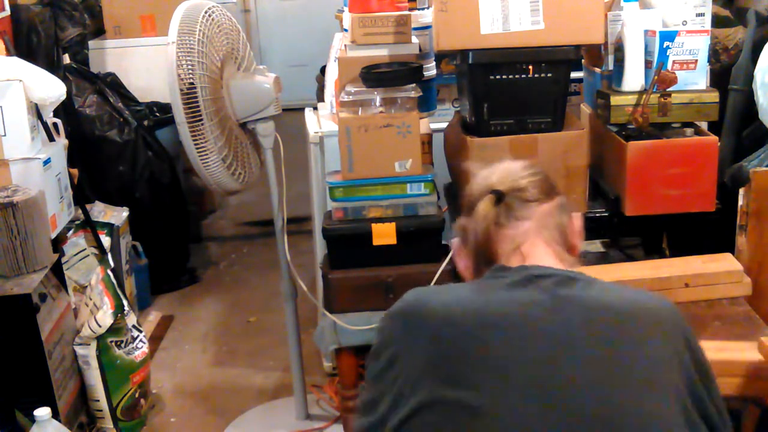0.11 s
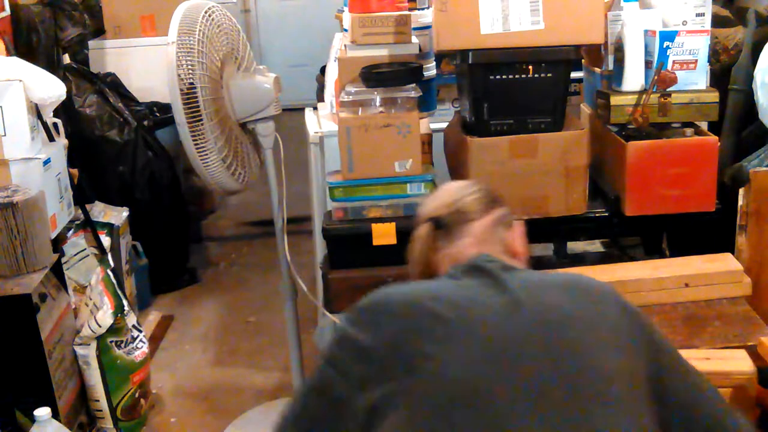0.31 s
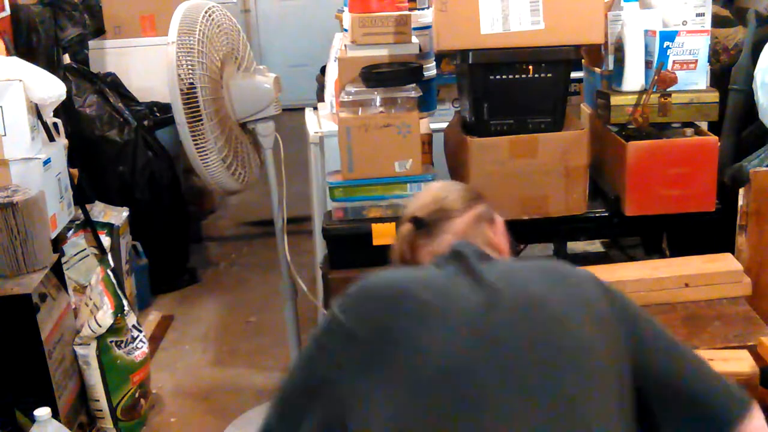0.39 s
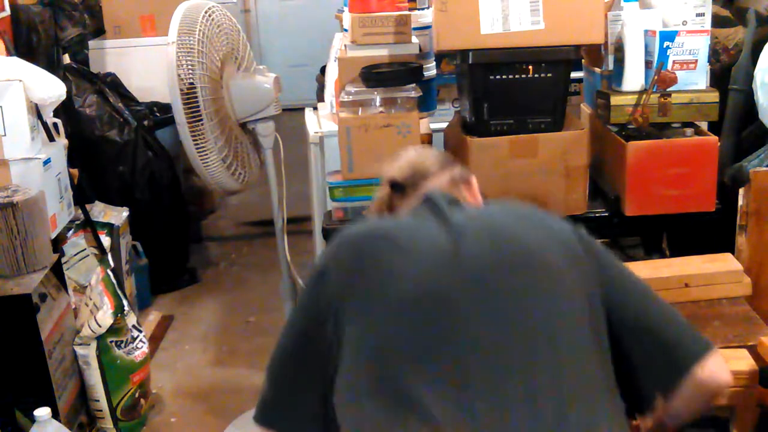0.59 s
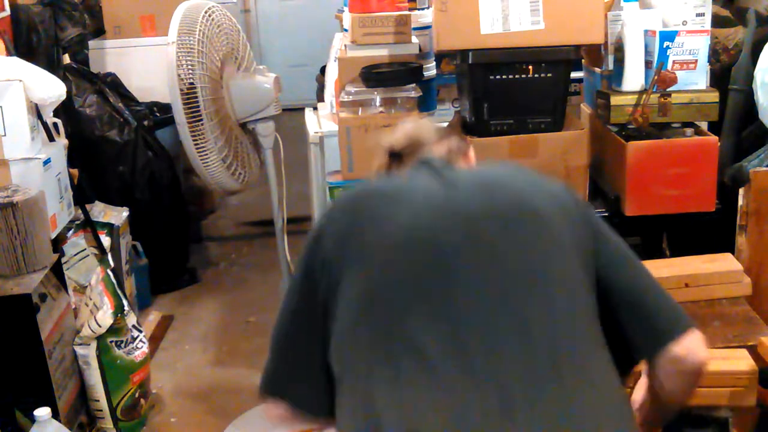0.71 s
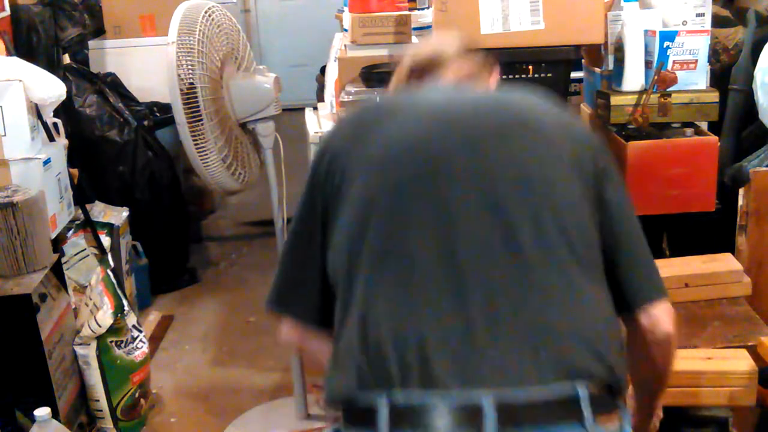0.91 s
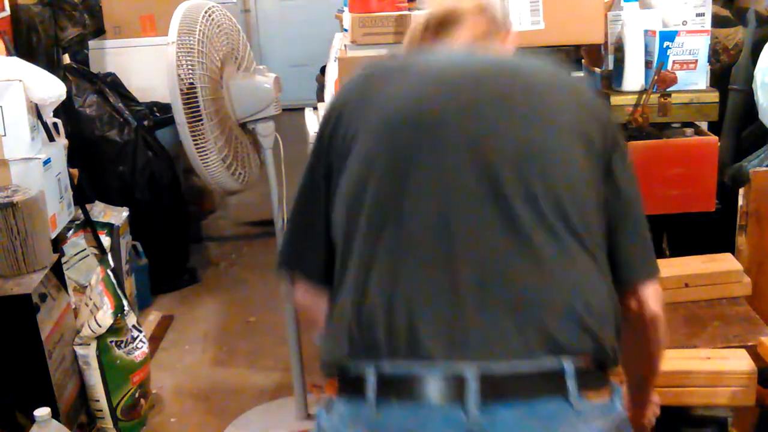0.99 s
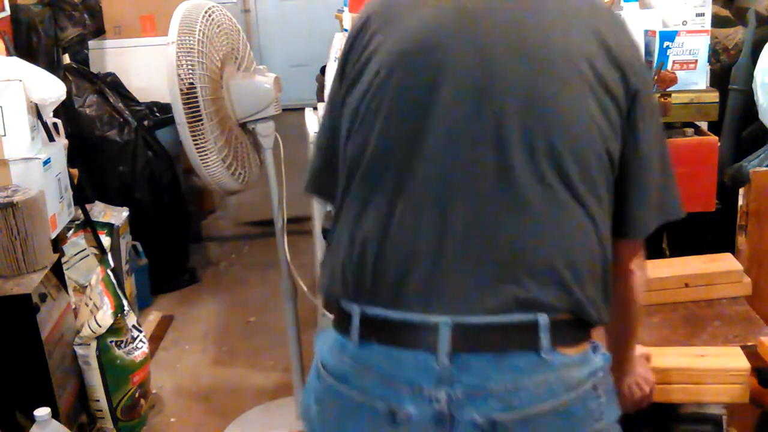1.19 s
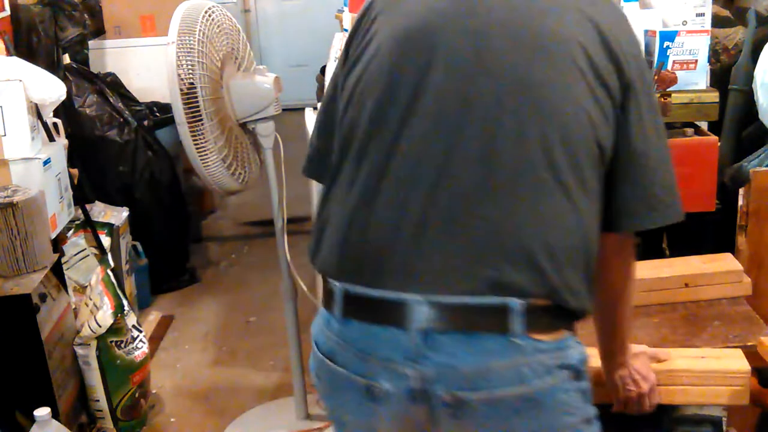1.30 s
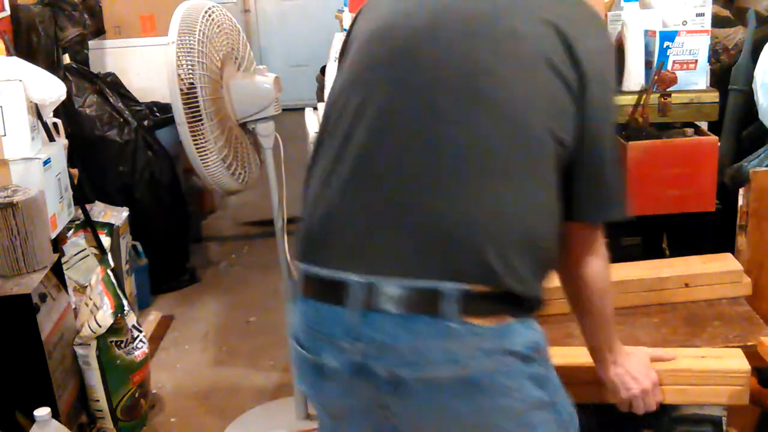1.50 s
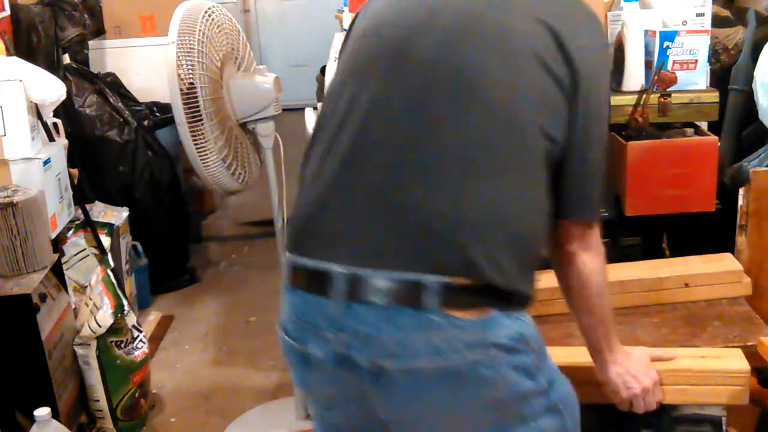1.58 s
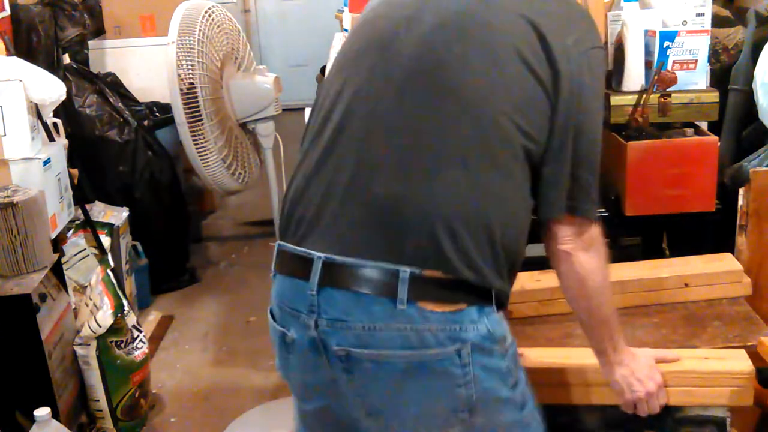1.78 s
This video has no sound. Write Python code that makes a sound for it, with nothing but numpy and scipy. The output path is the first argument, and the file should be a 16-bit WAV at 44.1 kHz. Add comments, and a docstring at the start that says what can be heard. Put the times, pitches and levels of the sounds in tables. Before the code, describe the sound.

Short wooden boards are stacked close by in a small, dry garage workroom. Faint scuffing and taps lead to a full, low clunk at 0.25 seconds, with small knocks after it. A bright clack at 0.7 starts a hollow, raspy slide along the pile until about 1.15, ending in a soft bump. Light bumps follow near 1.45 and 1.8, over faint hiss and low rumble.

```python
"""Short wooden boards are stacked in a small, dry garage workroom, over faint hiss and a low rumble.
After a scuff and small taps, one board clunks down and a second clacks against it: shaped noise and
ringing tones make the knocks, and swinging low tones make the pile's thumps. The board then slides
along the pile until it stops: random little slips drive its resonances and a dry rasp. Light scuffs,
made of thousands of tiny catches a second, and soft bumps go on to the end. Short echoes add the room."""
import sys
import numpy as np
from scipy import signal
from scipy.fft import rfft, irfft, next_fast_len
from scipy.io import wavfile

SR = 44100
rng = np.random.default_rng(int(sys.argv[2]) if len(sys.argv) > 2 else 0)


def wav_record(signal):
    """Record a signal, one row per channel, as 16-bit PCM in the file named by sys.argv[1]."""
    frames = np.transpose(np.atleast_2d(signal))
    bounded = np.clip(frames, -1, 1)
    # unit amplitude maps onto the largest positive 16-bit level
    quanta = np.round(bounded * 32767).astype(np.int16)
    wavfile.write(sys.argv[1], SR, quanta)


N = 79380
T = np.arange(N) / SR  # time in the scene [s]
RING_T = np.arange(int(.35 * SR)) / SR  # time since one contact [s]

# centres of the bass, body, crack and top registers: (frequency [Hz])
REGISTERS = (250, 1000, 4500, 10000)
# the longer rings of a board: (frequency [Hz], energy [dB], time to fall by 60 dB [s])
BOARD_RINGS = [(223, -20, 0.068), (326.2, -22, 0.16), (411.9, -19.5, 0.27), (499, -20, 0.06),
               (774, -24, 0.16), (828, -26.5, 0.11), (1110, -19, 0.053), (1278, -21, 0.043),
               (1618, -19.5, .09), (2113, -25, 0.054), (3030, -19, .16), (4330, -32, 0.1), (5500, -16, .17),
               (6305, -15, 0.057), (6090, -19, 0.077), (6650, -15.5, 0.069), (7230, -17.5, 0.15)]


def from_db(db):
    """Turn decibels into a gain."""
    return 10 ** (np.asarray(db) / 20)


def unit(x):
    """Scale a sound to a total energy of 1."""
    return x / np.sqrt(np.sum(x ** 2) + 1e-20)


def dying(t60):
    """Fade exponentially, falling by 60 dB in t60 seconds."""
    return np.exp(-np.log(1000) * RING_T / t60)


def shaped(x, points):
    """Colour a sound along (Hz, dB) points with a filter that never answers ahead of its input."""
    size = 2 * next_fast_len(len(x))
    hz, db = np.transpose(points)
    bins_hz = np.arange(size // 2 + 1) * SR / size
    curve_db = np.interp(np.log(bins_hz + 1), np.log(hz), db)
    # folding the cepstrum onto positive times gives the minimum-phase filter
    cepstrum = irfft(np.log(from_db(curve_db)))
    cepstrum[1:size // 2] *= 2
    cepstrum[size // 2 + 1:] = 0
    response = np.exp(rfft(cepstrum))
    return irfft(rfft(x, size) * response)[:len(x)]


def through(x, response):
    """Let every sample of x set off a copy of the response."""
    return signal.fftconvolve(x, response)[:len(x)]


def add(out, s, x):
    """Mix x in at time s [s], dropping what lies outside the scene."""
    start = int(s * SR)
    x, start = x[max(-start, 0):], max(start, 0)
    out[start:start + len(x)] += x[:max(N - start, 0)]


def ringing(modes):
    """Sum dying sine tones, each starting at a random point of its cycle."""
    total = np.zeros(len(RING_T))
    for hz, db, t60 in modes:
        tone = np.sin(2 * np.pi * (hz * RING_T + rng.random()))
        total += from_db(db) * unit(tone * dying(t60))
    return total


def friction(size, rate, spread_db):
    """Stick and slip: random clicks of uneven strength, scaled to an rms of 1."""
    strengths = from_db(spread_db * np.minimum(rng.exponential(1, size), 4))
    clicks = strengths * rng.choice([-1, 1], size)
    slips = rng.random(size) < rate / SR
    return unit(clicks * slips) * np.sqrt(size)


def background():
    """Filtered noise gives faint hiss, and a rumble that rises while the boards are moved."""
    # colour of the still room's hiss: (frequency [Hz], gain [dB])
    hiss_colour = [(60, -55), (140, -52), (300, -56.5), (1000, -62), (3000, -67), (6000, -67), (9000, -77),
                   (14000, -81)]
    # colour of the rumble: (frequency [Hz], gain [dB])
    rumble_colour = [(20, -36.5), (45, -40.5), (85, -40), (125, -60.5), (300, -82.5)]
    # rise and fall added to the rumble: (time [s], level [dB])
    rumble_level = [(0, 2), (.25, 0.5), (.32, 9), (.55, 3.5), (1.0, 1.5), (1.3, 0.5), (1.8, -2.5)]
    s, db = np.transpose(rumble_level)
    hiss, rumble = rng.standard_normal((2, N))
    return shaped(hiss, hiss_colour) + from_db(np.interp(T, s, db)) * shaped(rumble, rumble_colour)


def workroom(x):
    """Dense, quickly dying reflections from boxes and shelves, made from fading noise."""
    # colour of the reflections: (frequency [Hz], gain [dB])
    echo_colour = [(100, -12.5), (400, -13), (700, -3), (1500, -2.5), (5000, -4.5), (13000, -5)]
    t60_s, level_db, gap_s = 0.29, -4.5, 0.0028
    noise = rng.standard_normal(len(RING_T))
    echoes = unit(noise * dying(t60_s) * (RING_T > gap_s))
    return x + from_db(level_db) * shaped(through(x, echoes), echo_colour)


def scuffs():
    """Faces and edges rub briefly: the grain catches thousands of times a second and excites the board."""
    # rubs, with levels relative to one another:
    # (time [s], length [s], bass [dB], body [dB], crack [dB], top [dB])
    rubs = [(-.02, 0.15, -80, -65.5, -59.5, -65.5), (0.139, 0.14, -88, -63.5, -64.5, -75),
            (0.232, .105, -49.5, -46.5, -40.5, -46), (.335, 0.041, -66, -57.5, -45.5, -58),
            (0.379, .12, -59, -60.5, -85, -78), (0.538, 0.041, -56.5, -62, -67, -72),
            (0.583, 0.073, -59, -60, -99, -81), (.695, 0.057, -50.5, -48, -37, -51),
            (.742, 0.027, -52.5, -50, -33, -43.5), (0.768, 0.058, -57.5, -44.5, -58, -66),
            (0.877, 0.064, -60, -51.5, -51.5, -54), (1.04, 0.048, -87, -61, -53.5, -60.5),
            (1.119, 0.031, -62.5, -57, -48.5, -57.5), (1.156, 0.034, -58, -54.5, -62, -68),
            (1.19, 0.052, -63, -72, -76, -77), (1.454, 0.026, -57.5, -73.5, -57, -56),
            (1.615, 0.038, -72, -65.5, -58.5, -76)]
    attack_s, release_s, level_db = 0.009, .012, -25
    catches_per_s, catch_spread_db = 9000, 2
    ring_db = -9.5  # how strongly a rub excites the board's longer rings
    out = np.zeros(N)
    for s, length, *levels_db in rubs:
        onset = np.minimum(RING_T / attack_s, 1)
        stroke = onset * np.exp(-np.maximum(RING_T - length, 0) / release_s)
        force = stroke * friction(len(RING_T), catches_per_s, catch_spread_db)
        rub = force + from_db(ring_db) * through(force, ringing(BOARD_RINGS))
        add(out, s, shaped(rub, list(zip(REGISTERS, levels_db))))
    return from_db(level_db) * out


def thumps():
    """The pile gives under a board and swings for a few cycles in its two lowest modes."""
    # the pile takes weight: (time [s], pitch [Hz], level [dB], second mode against the first [dB])
    bumps = [(0.14, 198, -37.5, -8.5), (0.253, 146, -29, -6), (0.282, 79, -40.5, -17),
             (0.337, 135, -37.5, -14), (1.161, 408, -34, -11), (1.451, 176, -38.5, -4.5),
             (1.507, 160, -54, 3), (1.773, 187, -34.5, -8)]
    rise_s, t60_s, second_ratio = 0.0022, 0.049, 2.11
    out = np.zeros(N)
    swing = np.minimum(RING_T / rise_s, 1) * dying(t60_s)
    for s, hz, db, second_db in bumps:
        phase = 2 * np.pi * hz * RING_T
        second = from_db(second_db) * np.sin(second_ratio * phase)
        add(out, s, from_db(db) * swing * (np.sin(phase) + second))
    return out


def slide():
    """A board judders along the pile: slips at many points drive its hollow resonances and a dry rasp."""
    # strength of the sliding push: (time [s], level [dB])
    push_level = [(0.602, -65), (.68, -59.5), (0.708, -47), (.80, -50.5), (0.841, -52), (0.884, -42.5),
                  (.94, -47.5), (1.0, -47), (1.04, -48), (1.10, -51), (1.15, -63), (1.19, -69),
                  (1.302, -72)]
    # board lying on the pile: (frequency [Hz], energy [dB], time to fall by 60 dB [s])
    pile_rings = [(170.5, -7, 0.21), (198, -9.5, 0.085), (212, -4, 0.095), (312, -3, 0.16),
                  (335.6, -4.5, 0.13), (373.4, -4, 0.17), (418, -5.5, 0.19), (906, -7, 0.076),
                  (1630, -8, 0.021), (2370, -11.5, 0.011)]
    # colour of the dry rasp: (frequency [Hz], gain [dB])
    rasp_colour = [(50, -2), (90, 0), (180, 1.5), (600, 9), (1200, 4.5), (2500, -3.5), (3500, -4),
                   (7000, -6.5), (14000, -28.5)]
    slips_per_s, slip_spread_db, hollow_db = 1800, 1, -2.5
    s, db = np.transpose(push_level)
    push = from_db(np.interp(T, s, db, left=-120, right=-120))
    hollow = np.zeros(N)
    for mode in pile_rings:  # each resonance has its own slips
        slips = push * friction(N, slips_per_s, slip_spread_db)
        hollow += through(slips, ringing([mode]))
    rasp = shaped(push * friction(N, slips_per_s, slip_spread_db), rasp_colour)
    return from_db(hollow_db) * hollow + rasp


def board():
    """A board's answer to one contact: a brief crush, a burst of dense modes and the longer rings."""
    rise_s = 0.0036  # rough faces bed in over a few milliseconds
    crush_db, crush_t60_s = -10, .018
    grain_db, grain_t60_s = -0.5, 0.074  # the dense, short-lived modes
    rise = np.minimum(RING_T / rise_s, 1)
    crush, grain = rng.standard_normal((2, len(RING_T))) * rise
    crush = from_db(crush_db) * unit(crush * dying(crush_t60_s))
    grain = from_db(grain_db) * unit(grain * dying(grain_t60_s))
    return crush + grain + ringing(BOARD_RINGS)


def knocks():
    """Wood meets wood: flat blows are full and low, edge blows are bright."""
    # blows, with levels relative to one another:
    # (time [s], bass [dB], body [dB], crack [dB], top [dB])
    blows = [(0.078, -64, -48.5, -58, -83), (.134, -56, -50, -53, -66), (0.218, -53, -51.5, -69, -65),
             (0.229, -46, -58, -43, -42.5), (.253, -30.5, -27.5, -36, -53), (.259, -36.5, -31, -35, -44),
             (0.268, -37.5, -29, -42.5, -48), (.272, -40.5, -29, -38, -52), (.278, -48.5, -24.5, -55, -54),
             (.316, -54, -41.5, -32.5, -55), (.335, -56.5, -52, -54, -40.5), (.467, -83, -74, -60, -65),
             (0.517, -54.5, -57.5, -64, -68), (0.53, -65, -50.5, -66, -59), (0.683, -77, -55, -38.5, -51),
             (.691, -54, -51, -38, -42), (.716, -62, -46, -28, -33), (.737, -71, -42, -26, -29.5),
             (0.853, -58, -40.5, -48.5, -77), (.878, -50, -62, -40.5, -50), (0.983, -47.5, -45.5, -50, -91),
             (1.077, -85, -65, -54, -74), (1.162, -49.5, -49, -52, -76), (1.453, -54.5, -69, -54.5, -53),
             (1.506, -55.5, -67.5, -71, -72), (1.778, -47, -54, -53, -58.5),
             (1.788, -47, -50.5, -49.5, -63)]
    out = np.zeros(N)
    for s, *levels_db in blows:
        add(out, s, shaped(board(), list(zip(REGISTERS, levels_db))))
    return out


def stacking():
    """Boards knock, scuff, thump and slide in the room, over its background sound."""
    # colour of wood on wood, for knocks and scuffs: (frequency [Hz], gain [dB])
    wood_colour = [(50, 10), (110, 32), (190, 42), (480, 38), (640, 36), (1100, 36), (1650, 35.5),
                   (2300, 35.5), (3500, 32.5), (6500, 32), (7600, 31), (10500, 25.5), (14000, 15.5)]
    contacts = shaped(knocks() + scuffs(), wood_colour)
    return workroom(contacts + thumps() + slide()) + background()


def scene():
    """The lows are alike in both channels; the treble has a fine grain of its own in each."""
    # how much the channels differ: (frequency [Hz], side against mid [dB])
    side_colour = [(2000, -65), (3300, -57), (4800, -17.5), (7000, -8.5), (14000, -5.5)]
    mid = stacking()
    side = shaped(stacking(), side_colour)  # same events, fresh random detail
    return np.array([mid + side, mid - side])


def record(dry):
    """Cut the top steeply with a low-pass filter."""
    cutoff_hz = 14400
    low_pass = signal.ellip(10, .2, 70, cutoff_hz, fs=SR, output="sos")
    return signal.sosfilt(low_pass, dry)


dry = scene()
out = record(dry)
wav_record(out)
```